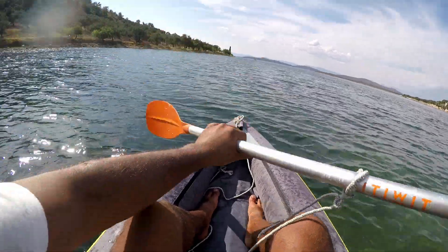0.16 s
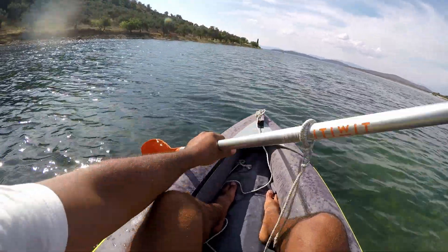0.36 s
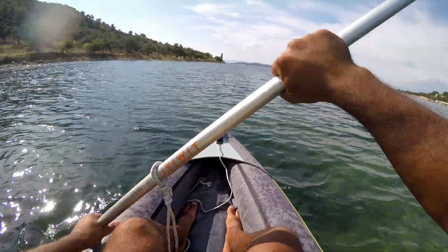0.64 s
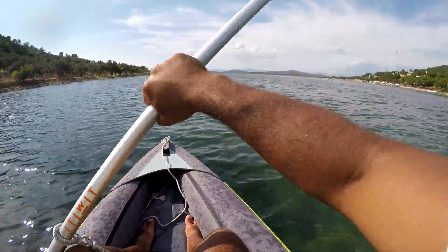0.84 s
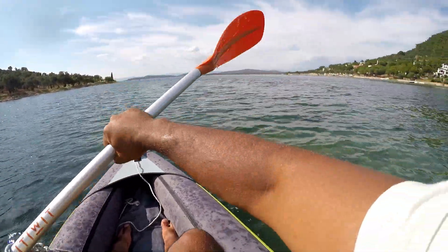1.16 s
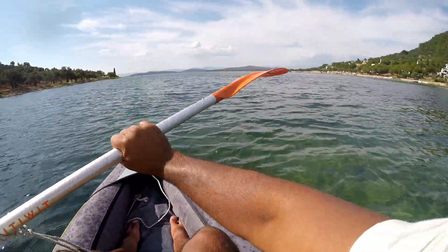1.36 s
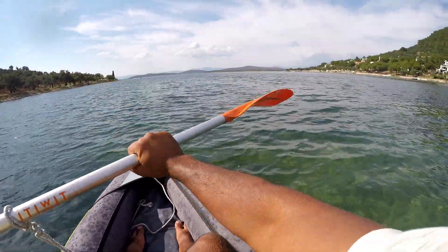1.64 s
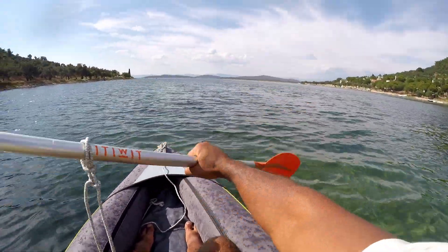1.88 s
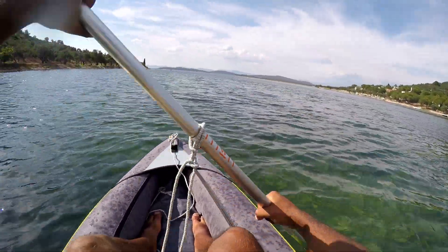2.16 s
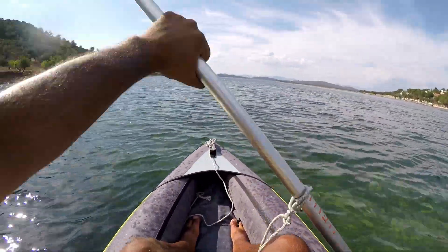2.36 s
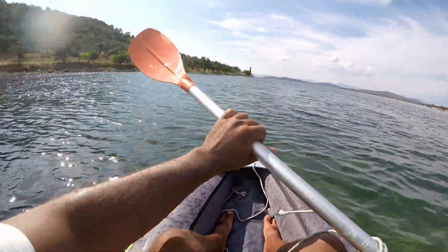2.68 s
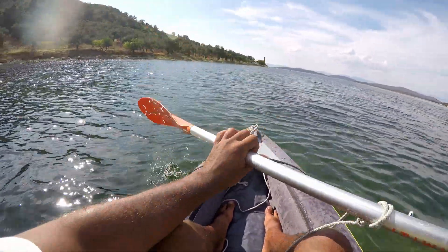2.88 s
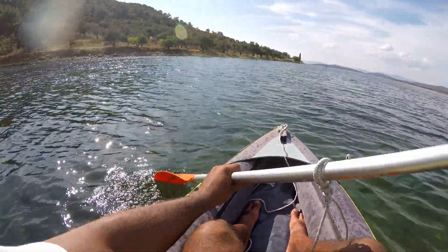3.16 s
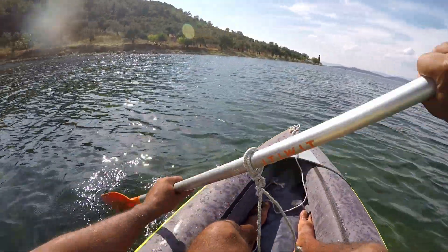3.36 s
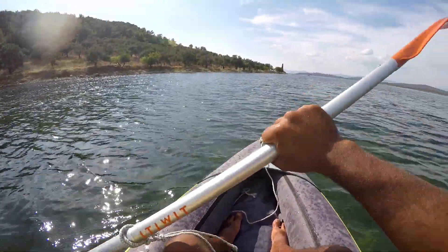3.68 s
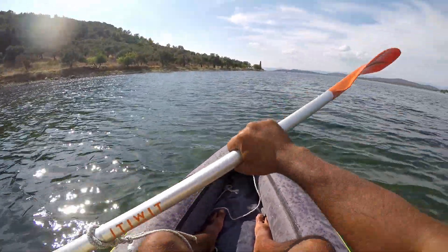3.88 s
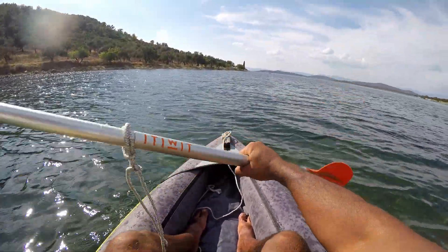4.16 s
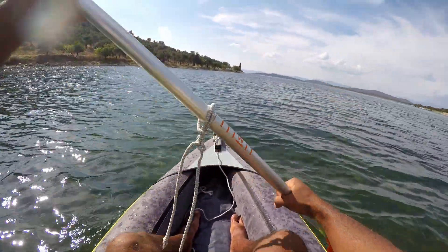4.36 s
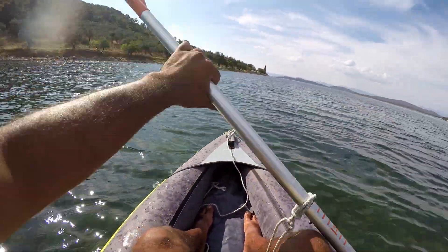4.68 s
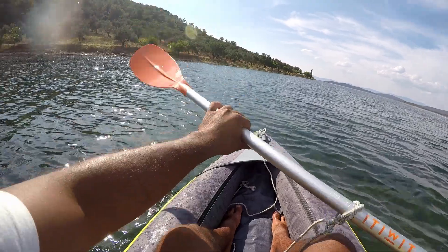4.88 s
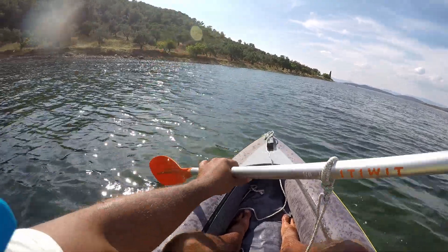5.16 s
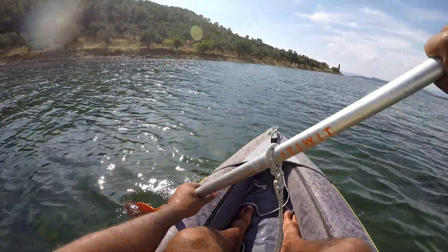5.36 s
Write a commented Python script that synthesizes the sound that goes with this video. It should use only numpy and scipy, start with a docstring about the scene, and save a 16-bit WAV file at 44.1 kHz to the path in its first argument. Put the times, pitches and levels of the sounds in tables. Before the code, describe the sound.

Close, boxy handling noise from inside a sealed camera case worn on a paddler's chest. Irregular hard plastic snaps and hollow knocks, the strongest near 1, 1.8 and 2.6 seconds, come with low thumps. Brief cloth rubs hiss between them, heaviest around 1.8, 4 and 5.2 seconds. Behind, very quiet muffled water washes along an inflatable kayak, with tiny bubbles and drips, outdoors on calm water.

```python
"""Rubs, snaps and knocks on a waterproof camera case worn on the chest while paddling an inflatable kayak.
Arms and shirt rub over the case (noise from tiny slips, shaped by resonances); its plastic mount slides,
snaps (ringing modes) and knocks (short dying tones), and the case thumps and rumbles (lows only).
Muffled water washes along the hull (coloured noise with bubbles) and drips from the blades (noise puffs).
The calm water is heard from inside the case, and the hardest snaps overload the microphone."""
import sys
import numpy as np
from scipy import signal
from scipy.fft import rfft, irfft
from scipy.io import wavfile
from scipy.ndimage import uniform_filter1d

SR = 44100
rng = np.random.default_rng(int(sys.argv[2]) if len(sys.argv) > 2 else 0)


def persist_wave(psi):
    """Save psi, clipped to +-1, as 16-bit WAV."""
    counts = np.round(np.clip(psi, -1, 1) * 32767).astype(np.int16)
    wavfile.write(sys.argv[1], SR, np.atleast_2d(counts).T)


N = 243873
TIME = np.arange(N) / SR
FREQS = np.maximum(np.fft.rfftfreq(N, 1 / SR), 1)

# resonances of the plastic mount: pitch_hz [Hz], width_hz [Hz], relative level_db [dB]
MOUNT_RESONANCES = [(402, 400, -15.5), (680, 170, -12.5), (1070, 310, -10), (1900, 560, -10.5),
                    (2160, 490, -5), (2790, 150, -0.5), (3140, 300, -10.5), (3900, 380, -17.5),
                    (4700, 440, -20.5), (6170, 1600, -24.5), (10000, 2400, -33), (14000, 3000, -38)]


def from_db(db):
    """Turn decibels into gain."""
    return 10 ** (np.asarray(db) / 20)


def rms_one(x):
    """Scale to an average strength (rms) of one."""
    return x / np.sqrt(np.mean(x ** 2) + 1e-20)


def level(rows):
    """Gain over time, drawn as straight lines in dB between (time_s, level_db) rows."""
    return from_db(np.interp(TIME, *np.transpose(rows)))


def drift(rate_hz):
    """Slow random wandering with a spread of one."""
    spectrum = rfft(rng.standard_normal(N))
    return rms_one(irfft(spectrum / (1 + (FREQS / rate_hz) ** 2), N))


def coloured(x, colour):
    """Shape a signal by (pitch_hz, level_db) points, falling away outside them; rms one."""
    hz, db = np.transpose(colour)
    gain = from_db(np.interp(np.log(FREQS), np.log(hz), db))
    gain = gain / (1 + (FREQS / hz[-1] / 2) ** 4)  # fade above the last point
    gain = gain / (1 + (hz[0] / FREQS / 2) ** 4)  # fade below the first point
    return rms_one(irfft(rfft(x) * gain, N))


def resonant(x, body):
    """Pass a signal through broad, steep-sided resonances; rms one."""
    power = 0
    for hz, width, db in body:
        off_pitch = (FREQS - hz * hz / FREQS) / width
        power = power + from_db(db) ** 2 / (1 + off_pitch ** 4)
    return rms_one(irfft(rfft(x) * np.sqrt(power), N))


def lowpass(x, hz):
    """Gently soften the treble with a one-pole filter."""
    return signal.sosfilt(signal.butter(1, hz, fs=SR, output="sos"), x)


def split(x, hz):
    """Divide a signal into the parts below and above a frequency."""
    low = irfft(rfft(x) / (1 + (FREQS / hz) ** 4), N)
    return low, x - low


def focus(x, hz, q):
    """Favour the band around one frequency; a higher q is narrower."""
    return signal.lfilter(*signal.iirpeak(hz, q, fs=SR), x)


def even(x, size):
    """Take the slow swells out of a noise, over a window of so many samples."""
    return x / np.sqrt(uniform_filter1d(x ** 2, size) + 1e-6)


def dying(t, t60):
    """Fade by 60 dB in t60 seconds."""
    return from_db(-60 * t / t60)


def ring(t, hz, t60):
    """A pure tone that dies away."""
    return np.sin(2 * np.pi * hz * t) * dying(t, t60)


def burst(t, t60):
    """A puff of noise that dies away."""
    return rng.standard_normal(len(t)) * dying(t, t60)


def add(out, start_s, peak_db, sound):
    """Mix in a sound at a given time and peak level."""
    at = round(start_s * SR)
    scaled = from_db(peak_db) * sound / np.abs(sound).max()
    out[at:at + len(sound)] += scaled[:N - at]


def swell(crest_s, db, db_per_s):
    """A motion's gain rises to a rounded crest and falls at the same rate."""
    round_s = 0.014  # how long the crest stays rounded
    distance_s = np.hypot(TIME - crest_s, round_s) - round_s
    return from_db(db - db_per_s * distance_s)


def touching(start_s, end_s, edge_s):
    """A contact starts and stops within a few milliseconds."""
    inside_s = np.minimum(TIME - start_s, end_s - TIME)
    return np.clip(inside_s / edge_s + .5, 0, 1)


def wash_and_bubbles(bubbles_per_s, bubble_db, cycles):
    """Water moves along the hull as uneven noise; small bubbles in it ring like tiny bells."""
    # level of the water wash as heard, with dips where it is turned down: time_s [s], level_db [dB]
    heard_level = [(0, -52), (0.6, -55), (0.8, -54.5), (1.2, -48), (1.29, -60.5), (1.5, -61), (1.75, -49),
                   (2.07, -55.5), (2.55, -54.5), (2.73, -60), (3.1, -60), (3.3, -56), (3.8, -54),
                   (4.5, -57), (4.85, -54), (5.53, -52.5)]
    # colour of the wash: pitch_hz [Hz], relative level_db [dB]
    wash_colour = [(150, 8), (300, 1.5), (600, -3), (900, -5.5), (1550, -8), (1950, -1.5), (2700, -6.5),
                   (3200, -7), (3850, 2), (4400, -7.5), (4850, -4), (5600, -11.5), (9000, -18.5),
                   (15500, -27.5)]
    bubbles, t = np.zeros(N), TIME[:SR // 20]
    for when, pitch, strength in rng.random((int(bubbles_per_s * N / SR), 3)):
        hz = 500 * 9 ** pitch
        # a bubble's pitch rises as it nears the surface
        bubble = ring(t + 3 * t * t, hz, cycles / hz)
        add(bubbles, when * TIME[-1], bubble_db - 18 * np.sqrt(strength), bubble)
    uneven_noise = rng.standard_normal(N) * from_db(1.9 * drift(25))
    return level(heard_level) * (coloured(uneven_noise, wash_colour) + bubbles)


def drips(t60, q):
    """Drops fall from the blades, each a short puff of noise around one pitch."""
    # the biggest drops: start_s [s], peak_db [dB], pitch_hz [Hz]
    big_drops = [(0.651, -37.5, 3500), (0.660, -46, 1380), (1.335, -43.5, 2640), (1.385, -47, 3830),
                 (2.906, -45, 2740), (3.648, -34, 3610), (3.750, -46.5, 1200), (4.983, -39.5, 2070)]
    # smaller drops fall at random
    drops_per_s, loudest_db, range_db = 14, -48.5, 9
    low_hz, high_hz = 1300, 4000
    drops = list(big_drops)
    for when, weak, pitch in rng.random((int(drops_per_s * N / SR), 3)):
        hz = low_hz * (high_hz / low_hz) ** pitch
        drops.append((when * TIME[-1], loudest_db - range_db * weak, hz))
    out, t = np.zeros(N), TIME[:SR // 20]
    for start_s, peak_db, hz in drops:
        spatter = burst(t, t60)
        add(out, start_s, peak_db, focus(focus(spatter, hz, q), hz, q))
    return out


def rumble(scuff_gain, mount_gain):
    """Heaves of the body and sliding contacts shake the case: a low rumble over a slower sway."""
    # heaves, before the strap softens them: crest_s [s], level_db [dB], swell and fade db_per_s [dB/s]
    heaves = [(0.28, -27, 46), (0.63, -36.5, 130), (0.76, -34.5, 377), (1.01, -21.5, 219.5),
              (1.868, -17, 168), (2.611, -20, 244.5), (2.83, -39, 90), (3.74, -37.5, 120),
              (3.859, -26.5, 333), (4.129, -20, 154), (4.80, -30.5, 129), (5.171, -21, 189),
              (5.40, -30.5, 216)]
    # slow rocking of the body, before its gain below and the strap: time_s [s], level_db [dB]
    sway_level = [(0.0, -38.5), (0.91, -37.5), (1.03, -25), (1.09, -36), (1.66, -39.5), (1.86, -22),
                  (2.03, -44.5), (2.6, -25.5), (2.63, -33), (3.0, -48.5), (3.45, -32.5), (3.57, -52),
                  (3.67, -31.5), (4.05, -42.5), (4.14, -20), (4.24, -42), (5.53, -31)]
    # colour of the rumble: pitch_hz [Hz], relative level_db [dB]
    rumble_colour = [(25, -17), (45, -8.5), (65, -2.5), (98, -2), (118, -10), (145, -21), (220, -21.5),
                     (400, -30.5)]
    # colour of the sway: pitch_hz [Hz], relative level_db [dB]
    sway_colour = [(10, -4.5), (20, 12), (32, 2), (50, -1), (80, -32)]
    shake = even(coloured(rng.standard_normal(N), rumble_colour), size=2200)
    sway = even(coloured(rng.standard_normal(N), sway_colour), size=5000)
    causes = [swell(*heave) for heave in heaves]
    causes.append(from_db(-52.5))  # rest between heaves
    causes.append(from_db(8.5) * scuff_gain)  # sliding cloth shakes the case
    causes.append(from_db(1.5) * mount_gain)  # so does the sliding mount
    shake_gain = np.sqrt(sum(gain ** 2 for gain in causes))
    return shake * shake_gain + from_db(1) * sway * level(sway_level)


def thumps(rise_s):
    """A shove builds over a few milliseconds and leaves the case swinging."""
    # bounces on the strap, before it softens them: start_s [s], peak_db [dB], pitch_hz [Hz], t60_s [s]
    bounces = [(0.203, -15.5, 82, 0.044), (0.9340, -11, 78.9, 0.21), (1.002, -2, 76.1, 0.05),
               (1.023, -13.5, 31.4, .15), (1.5620, -28, 79.2, 0.12), (1.827, -4, 65.3, 0.06),
               (2.586, -2, 90.7, 0.045), (3.2250, -33, 74, 0.078), (4.098, -11, 80.6, 0.2),
               (5.175, -8.5, 88, 0.03)]
    out, t = np.zeros(N), TIME[:SR // 3]
    for start_s, peak_db, hz, t60 in bounces:
        add(out, start_s, peak_db, ring(t, hz, t60) * (1 - np.exp(-t / rise_s)))
    return out


def strap(x, top_hz):
    """The soft strap lets only the lows through."""
    return signal.sosfilt(signal.butter(4, top_hz, fs=SR, output="sos"), x)


def friction(slips_per_s, spread_db, judder_db):
    """Countless tiny slips of uneven size, while the contact pressure judders."""
    slips = (rng.random(N) < slips_per_s / SR) * rng.standard_normal(N)
    return slips * from_db(spread_db * rng.standard_normal(N) + judder_db * drift(31))


def cloth_gains(edge_s, flutter_db):
    """Each rub speeds up and slows down a little unevenly; hiss, treble and scuff follow the motion."""
    # cloth rubs: start_s [s], fastest_s [s], end_s [s], hiss_db [dB], treble tilt_db [dB],
    # low scuff_db [dB], swell and fade db_per_s [dB/s]; case_rubbing() trims hiss and scuff overall
    cloth_rubs = [ (0.237, 0.323, 0.43, -43, 3.5, -45.5, 30), (0.933, 0.933, 1.005, -31, -4, -34.5, 107),
                  (1.224, 1.24, 1.273, -42, -0.5, -48.5, 120), (1.732, 1.808, 1.830, -27, -2.5, -39, 165),
                  (1.845, 1.855, 1.925, -38, 1, -46.5, 130), (1.933, 1.974, 2.045, -47.5, -2, -61, 44),
                  (2.337, 2.348, 2.388, -53, 4.5, -52, 100), (2.446, 2.487, 2.500, -47.5, 6.5, -50.5, 162),
                  (2.626, 2.666, 2.705, -36, 3, -49.5, 283), (2.749, 2.793, 2.820, -44, 3.5, -53, 278),
                  (3.224, 3.244, 3.32, -47.5, -6, -50, 101), (3.328, 3.337, 3.365, -42, -1.5, -46.5, 283),
                  (3.420, 3.476, 3.49, -44.5, -6.5, -51.5, 131), (3.843, 3.864, 3.897, -37.5, -2, -45, 200),
                  (3.901, 4.03, 4.092, -25.5, 2.5, -39, 172), (4.120, 4.140, 4.236, -40, -2, -47, 45),
                  (4.324, 4.368, 4.410, -44.5, -1, -55.5, 282),
                  (5.012, 5.051, 5.085, -30.5, -2.5, -45, 364), (5.089, 5.102, 5.2, -45, -7, -47, 70),
                  (5.168, 5.203, 5.298, -27, 2, -41, 150), (5.329, 5.334, 5.352, -39.5, 1, -50, 350), ]
    gains = np.zeros((3, N))
    for start, fastest, end, hiss_db, tilt_db, scuff_db, db_per_s in cloth_rubs:
        motion = touching(start, end, edge_s) * swell(fastest, 0, db_per_s)
        gains += np.outer(from_db([hiss_db, hiss_db + tilt_db, scuff_db]), motion)
    return gains * from_db(flutter_db * drift(30))


def case_rubbing(hiss_gain, treble_gain, scuff_gain):
    """Cloth and skin slide over the case; the slips excite its high and low resonances."""
    # high resonances of the case: pitch_hz [Hz], width_hz [Hz], relative level_db [dB]
    hiss_body = [(1740, 150, -3.5), (1942, 240, 0), (2420, 160, -7), (2950, 350, -4.5), (3410, 200, -1.5),
                 (3985, 240, -3), (4710, 400, -12), (5420, 400, -14), (6310, 560, -15), (7030, 650, -20.5),
                 (9040, 710, -16), (10500, 1000, -27.5), (13100, 5100, -32.5)]
    # low resonances of the case: pitch_hz [Hz], width_hz [Hz], relative level_db [dB]
    scuff_body = [(280, 190, -0.5), (450, 500, -0.5), (718, 67, -0.5), (1130, 380, -7)]
    slips = friction(slips_per_s=15000, spread_db=2.0, judder_db=2.73)
    middle, treble = split(resonant(slips, hiss_body), hz=6530)
    hiss = middle * hiss_gain + treble * treble_gain
    scuff = resonant(slips, scuff_body) * scuff_gain
    return from_db(-1.8) * hiss + from_db(2.0) * scuff


def scrape():
    """A hard-pressed, dull scrape over the case, made of tiny slips."""
    # colour of the scrape: pitch_hz [Hz], relative level_db [dB]
    scrape_colour = [(180, -50), (300, -28), (550, -10.5), (680, 0.5), (1050, -4.5), (1350, -12),
                     (1850, -3), (2250, -12.5), (2650, -9.5), (3450, -23.5), (4720, -19.5), (5570, -35.5),
                     (15500, -51)]
    slips = friction(slips_per_s=3800, spread_db=2.0, judder_db=0.5)
    contact = touching(start_s=1.030, end_s=1.087, edge_s=0.003)
    return from_db(-28) * coloured(slips, scrape_colour) * contact


def brush():
    """A light brushing follows the scrape, as smooth noise."""
    # colour of the brushing: pitch_hz [Hz], relative level_db [dB]
    brush_colour = [(180, 0.5), (300, -13), (708, -21), (863, -20.5), (4490, -30), (12100, -31.5),
                    (15500, -38)]
    contact = touching(start_s=1.087, end_s=1.225, edge_s=0.0094)
    return from_db(-44.5) * coloured(rng.standard_normal(N), brush_colour) * contact


def slip_gain(edge_s):
    """The mount breaks loose, slides fastest just afterwards and slows down."""
    # slips in the joint, before mount_sliding() trims them: start_s [s], end_s [s], level_db [dB]
    joint_slips = [(0.052, 0.132, -27.5), (0.454, 0.518, -36.5), (2.104, 2.182, -33.5), (5.432, 5.472, -43)]
    peak_delay_s, fade_db_per_s = 0.019, 220
    gain = np.zeros(N)
    for start, end, db in joint_slips:
        gain += touching(start, end, edge_s) * swell(start + peak_delay_s, db, fade_db_per_s)
    return gain


def mount_sliding(mount_gain):
    """The mount slips in its joint and its plastic resonates."""
    slips = friction(slips_per_s=3400, spread_db=3.0, judder_db=0.5)
    return from_db(-5.5) * resonant(slips, MOUNT_RESONANCES) * mount_gain


def knocks(overtone, overtone_db, soft_hz):
    """A blunt contact sounds a low, heavily damped wall mode and its overtone."""
    # blunt knocks on the case: start_s [s], peak_db [dB], pitch_hz [Hz]
    blunt_hits = [(0.1425, -25, 845), (0.2011, -18.5, 430), (0.639, -34.5, 980), (0.7350, -41.5, 370),
                  (0.9289, -7, 1110), (0.9546, -17, 910), (1.0030, 3, 1750), (1.0042, 14.5, 690),
                  (1.564, -37.5, 317), (1.8240, -0.5, 1034), (1.8306, -13, 573), (1.835, -15.5, 238),
                  (1.904, -26, 345), (2.347, -32, 440), (2.5600, -23.5, 694), (2.5846, -11, 860),
                  (2.5880, -2, 710), (2.5900, -8, 327.5), (2.6850, -33, 362), (3.7850, -38.5, 403),
                  (4.092, -16, 624), (4.0980, -18, 262), (4.827, -31, 380), (5.1250, -26.5, 517),
                  (5.1740, -15.5, 593), (5.178, -18.5, 328), (5.384, -34.5, 453)]
    out, t = np.zeros(N), TIME[:SR // 12]
    for start_s, peak_db, hz in blunt_hits:
        t60 = 5.8 / hz  # a knock dies away within this many swings
        wall = ring(t, hz, t60)
        upper = from_db(overtone_db) * ring(t, overtone * hz, t60)
        add(out, start_s, peak_db, lowpass(wall + upper, soft_hz))
    return out


def scatter(size, mean_s, step_hz):
    """An impulse smeared by its path through the plastic: each pitch has its own small delay."""
    hz = np.fft.rfftfreq(size, 1 / SR)
    delays = mean_s * np.minimum(rng.exponential(1, 200), 3)  # no delay beyond three times mean_s
    delay = np.interp(hz / step_hz, np.arange(len(delays)), delays)
    # adding up delay over frequency gives the phase
    phase = -2j * np.pi * np.cumsum(delay) * hz[1]
    return irfft(np.exp(phase), size)[:size // 2]


def snaps(uneven_db, scatter_s, crack_db, crack_t60, tail_db, tail_t60, focus_q):
    """The joint lets go with a crack that rings the mount's modes; the plastic mount rings on faintly."""
    # snaps of the mount: start_s [s], level_db [dB, rms of the first 4 ms], colour centre_hz [Hz]
    joint_snaps = [(0.052, -40, 2340), (0.081, -38, 2380), (0.1411, -16, 2470), (0.2440, -33.5, 4040),
                   (0.9276, -9, 3420), (1.0030, -6, 1840), (1.122, -42, 3500), (1.228, -28, 3700),
                   (1.233, -33.5, 3740), (1.8187, -11.5, 3900), (1.8228, -6, 3800), (1.8295, -12.5, 4170),
                   (2.5592, -6.5, 3680), (2.5757, -18, 2520), (2.5872, 0.5, 2900), (2.8600, -49.5, 5040),
                   (3.2251, -27.5, 2590), (3.3280, -43, 2800), (3.8430, -32, 4400), (4.09, -23, 2840),
                   (4.1230, -29, 3810), (5.0124, -22.5, 2780), (5.1721, -25, 5200), (5.343, -40, 2470)]
    # what the mount rings with: pitch_hz [Hz], relative level_db [dB], t60_s [s]
    mount_modes = [(790, -18, 0.041), (1000, -7.5, 0.013), (1270, -8, 0.021), (1350, -12.5, 0.0061),
                   (1860, -5.5, 0.0079), (2214, -8, 0.02), (2675, -3, 0.011), (2830, -2, 0.0081),
                   (3390, -2, 0.0074), (3948, -5, 0.016), (4530, -7.5, .008), (5370, -15.5, 0.013),
                   (6480, -18.5, 0.012), (7300, -18, 0.005), (8700, -23, 0.0056), (10800, -22.5, 0.0039)]
    out, t = np.zeros(N), TIME[:SR // 10]
    mount_noise = resonant(rng.standard_normal(N), MOUNT_RESONANCES)
    for start_s, db, centre_hz in joint_snaps:
        at = round(start_s * SR)
        strengths = from_db(uneven_db * rng.standard_normal(len(mount_modes)))
        modes = np.zeros(len(t))
        for k, (hz, mode_db, t60) in enumerate(mount_modes):
            # neighbouring modes start in opposite directions
            modes += (-1) ** k * strengths[k] * from_db(mode_db) * ring(t, hz, t60)
        force = scatter(size=2048, mean_s=scatter_s, step_hz=317)
        crack = from_db(crack_db) * burst(t, crack_t60)
        struck = signal.fftconvolve(force, modes)[:len(t)] + crack
        tail = np.roll(mount_noise, -at)[:len(t)] * from_db(tail_db) * dying(t, tail_t60)
        snap = (focus(struck, centre_hz, focus_q) + tail)[:N - at]
        out[at:at + len(snap)] += from_db(db) * snap / snap[:SR // 250].std()
    return out


def scene():
    """Everything reaches the one microphone through the case."""
    hiss_gain, treble_gain, scuff_gain = cloth_gains(edge_s=0.007, flutter_db=0.5)
    mount_gain = slip_gain(edge_s=0.0011)
    lake = wash_and_bubbles(bubbles_per_s=45, bubble_db=7.5, cycles=22) + drips(t60=.05, q=5.6)
    body = strap(thumps(rise_s=0.01) + rumble(scuff_gain, mount_gain), top_hz=122)
    rubs = case_rubbing(hiss_gain, treble_gain, scuff_gain) + scrape() + brush()
    sliding = mount_sliding(mount_gain)
    blows = knocks(overtone=2.1, overtone_db=-11.0, soft_hz=2600)
    cracks = snaps(uneven_db=2.5, scatter_s=.0004, crack_db=-11.5, crack_t60=0.012,
                   tail_db=-29, tail_t60=0.057, focus_q=1.0)
    return (lake + body + rubs + sliding + blows + cracks)[None]


def record(dry):
    """The microphone overloads softly near full scale, and the top is cut steeply."""
    cutoff_hz = 15400
    clipped = dry / (1 + (dry / .97) ** 6) ** (1 / 6)
    return signal.sosfilt(signal.ellip(10, .1, 70, cutoff_hz, fs=SR, output="sos"), clipped)


dry = scene()
out = record(dry)
persist_wave(out)
```